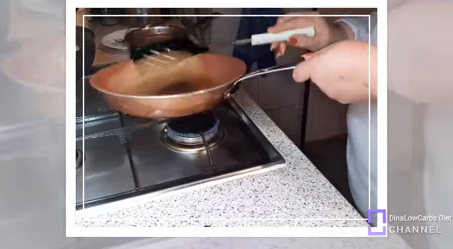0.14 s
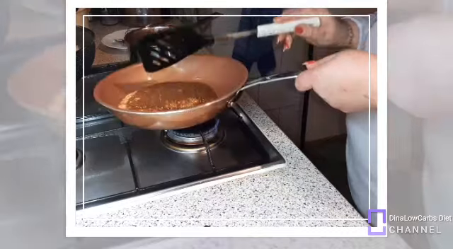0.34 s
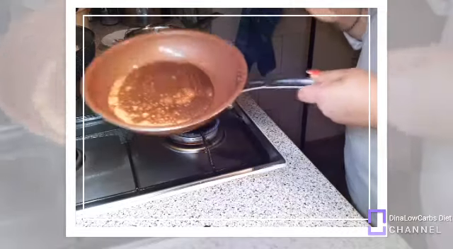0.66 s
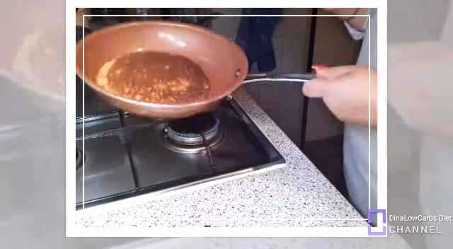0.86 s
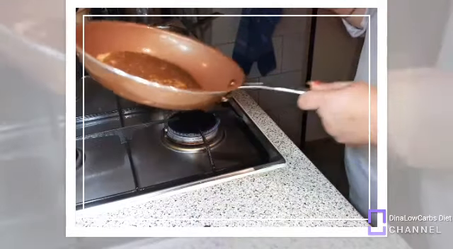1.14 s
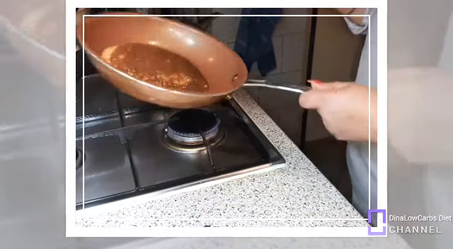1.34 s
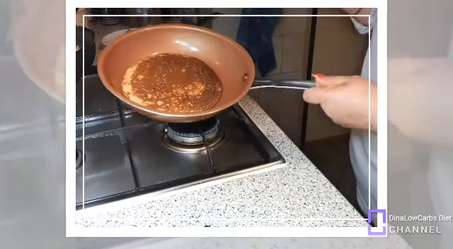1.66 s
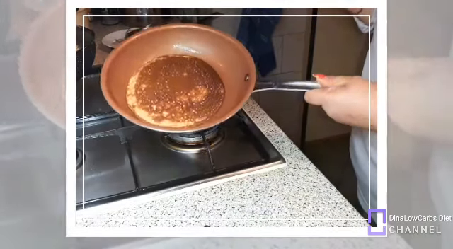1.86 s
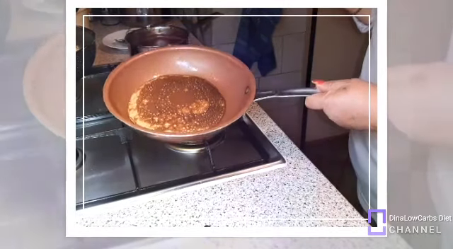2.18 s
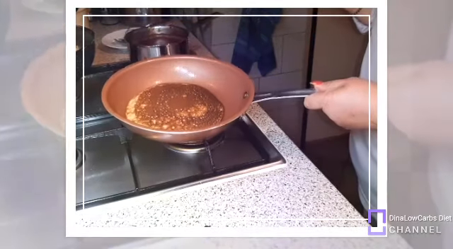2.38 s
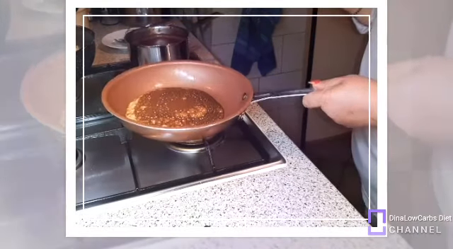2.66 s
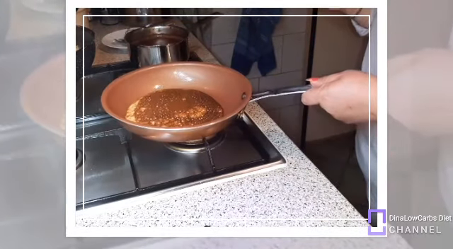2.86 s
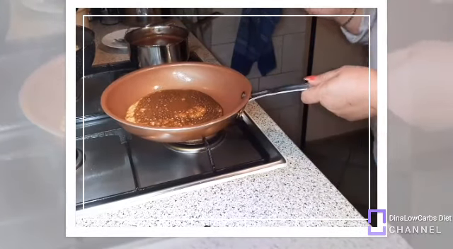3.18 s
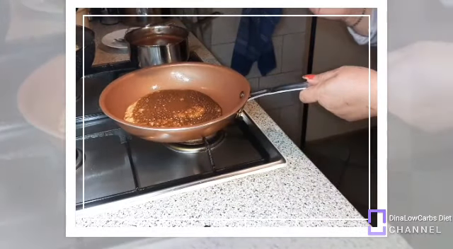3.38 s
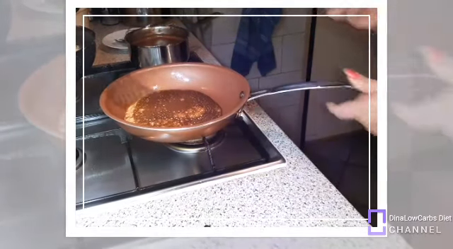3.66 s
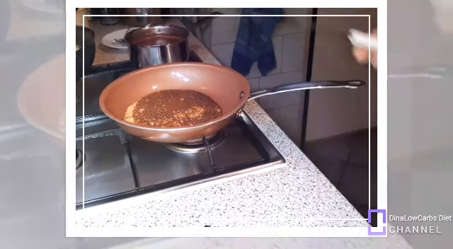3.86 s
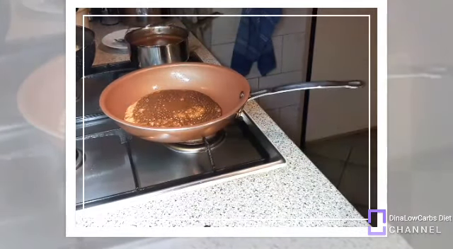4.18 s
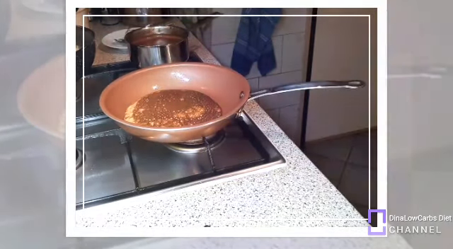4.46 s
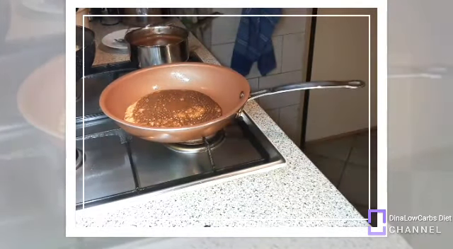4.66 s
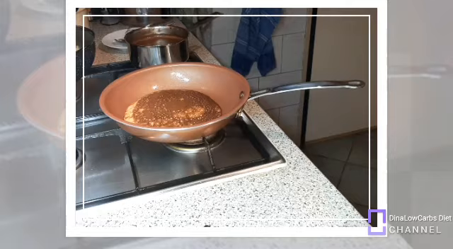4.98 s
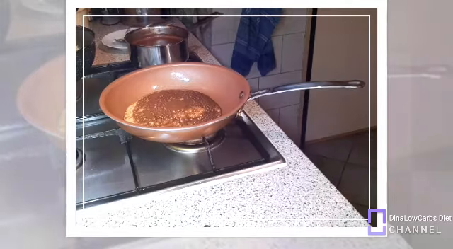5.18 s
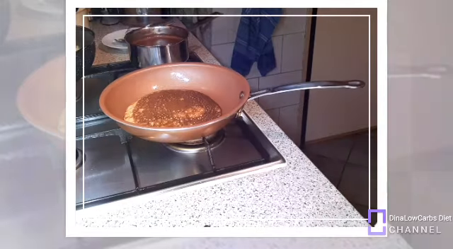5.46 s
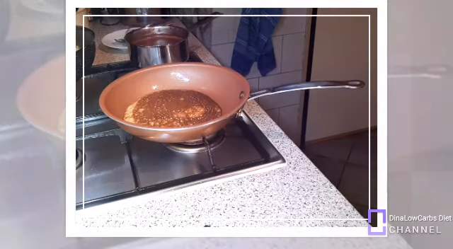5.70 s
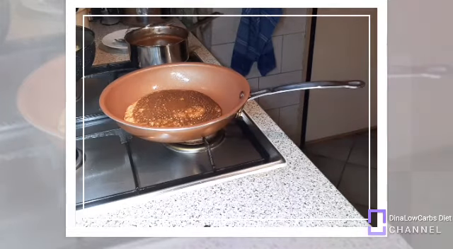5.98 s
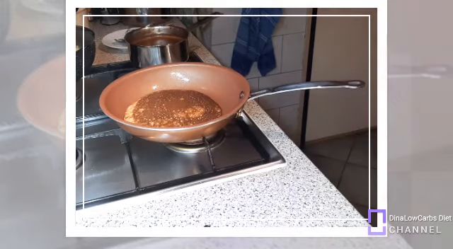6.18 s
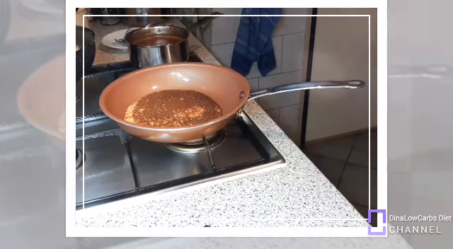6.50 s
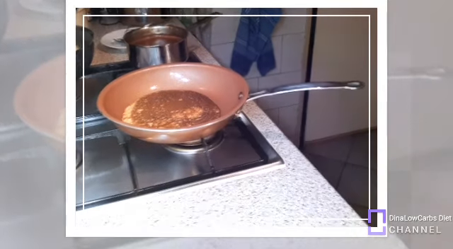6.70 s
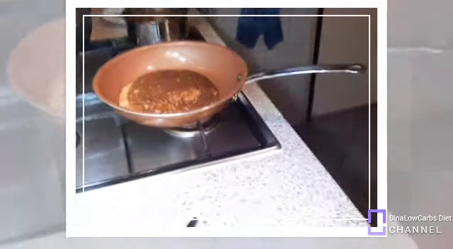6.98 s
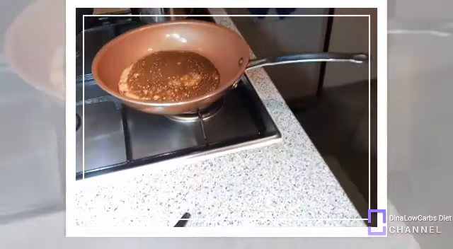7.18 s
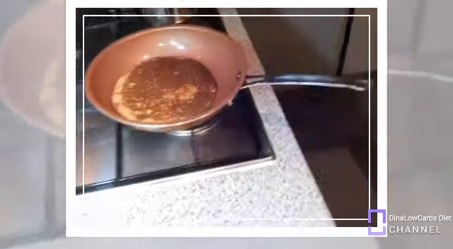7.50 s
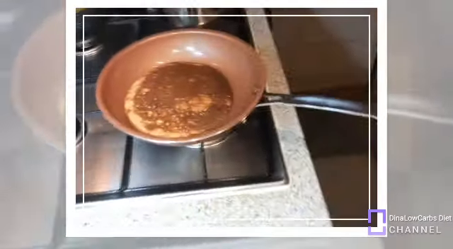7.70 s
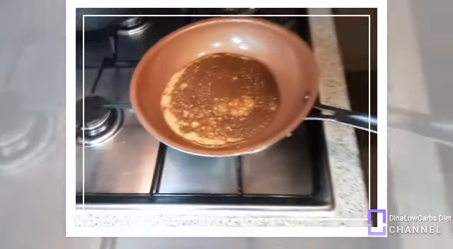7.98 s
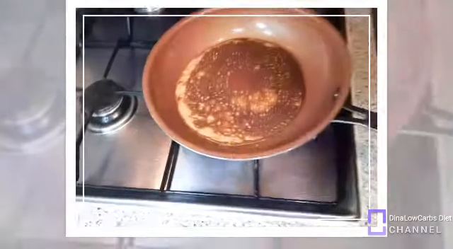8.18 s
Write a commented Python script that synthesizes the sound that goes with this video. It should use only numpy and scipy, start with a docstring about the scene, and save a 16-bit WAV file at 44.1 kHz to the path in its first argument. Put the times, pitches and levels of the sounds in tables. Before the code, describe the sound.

A pancake slaps into a hot pan and sizzles away, the pan knocks on its grate, then steel ware clatters loudly in a tiled kitchen.

```python
"""A pancake slaps into a hot pan and sizzles down: flickering noise bands, bright spits, dull pops.
The pan is knocked back onto its grate: damped modes, noise bursts and a rumble. Further off, steel ware
clatters and bounces in a tiled kitchen: close mode pairs, a rattle and dense echoes. The gas flame is
low noise and a drone. Two ports hear most near sounds a little apart in time and level."""
import sys
import numpy as np
from scipy import signal
from scipy.fft import rfft, irfft, next_fast_len
from scipy.io import wavfile
from scipy.ndimage import uniform_filter1d

SR = 44100
rng = np.random.default_rng(int(sys.argv[2]) if len(sys.argv) > 2 else 0)


def generate_wav(signal):
    """Clip the signal to [-1, 1] and save it as 16-bit WAV at the path in sys.argv[1]."""
    frames = np.transpose(np.atleast_2d(signal))
    scaled = np.clip(frames, -1, 1) * 32767
    pcm = np.round(scaled).astype(np.int16)
    wavfile.write(sys.argv[1], SR, pcm)


N = 367783
SIZE = next_fast_len(N + SR)  # transform length [samples]
HZ = np.arange(SIZE // 2 + 1) * SR / SIZE

# the batter's slap: (time [s], levels in the four pan ranges [dB], t60 [s], rise [s])
SLAP = 0.199, (-24.5, -30, -20, -12.5), 0.054, 0.001
# pops of fat and dry ticks: (time [s], level [dB], centre [Hz], fall-off [dB per octave])
TICKS = [(1.165, -36, 5000, 12), (1.435, -30, 1810, 11.5), (1.779, -39.5, 4500, -1.5),
         (6.191, -17, 2080, 31), (6.219, -46, 4500, 3), (6.499, -43, 500, 4), (6.636, -24.5, 615, 19.5),
         (6.75, -37.5, 350, 2.5), (7.554, -34.5, 796, 14)]
# middles of the pan's ranges: (frequency [Hz])
PAN_RANGE_HZ = 350, 1000, 2400, 5800


def slap_and_ticks():
    """Impulsive excitation: a brief contact gives a decaying burst of noise."""
    slap_s, slap_db, slap_t60, slap_rise = SLAP
    dry = burst(slap_s, PAN_RANGE_HZ, np.array(slap_db), slap_t60, slap_rise)
    for s, level_db, centre_hz, slope_db in TICKS:
        octaves_away = np.abs(np.log2(np.array(PAN_RANGE_HZ) / centre_hz))
        dry += burst(s, PAN_RANGE_HZ, level_db - slope_db * octaves_away, t60=0.043, rise=0.0034)
    return ports(dry, lag=5, pan_db=6) + undb(-15) * room(dry)


# (time [s], level of the sizzle [dB], level of the low middle [dB])
SIZZLE = [(0.129, -71, -72), (0.19, -49, -59.5), (0.216, -39.5, -53.5), (0.235, -41, -53),
          (0.455, -47.5, -64.5), (0.6, -52, -64), (0.691, -47, -61), (0.813, -54.5, -64.5),
          (0.98, -55.5, -77.5), (1.18, -53, -70), (1.33, -56, -69.5), (1.7, -59, -81), (2.0, -61, -77),
          (2.5, -63, -73.5), (3.0, -64, -67), (3.3, -66.5, -78.5), (3.56, -66.5, -63.5), (3.73, -69, -76),
          (3.93, -64.5, -69), (4.2, -68, -69), (4.44, -65.5, -77.5), (4.73, -67, -75), (5.6, -67, -85),
          (5.77, -66, -64), (5.881, -70.5, -67), (6.2, -62, -84.5), (6.33, -72.5, -83), (6.648, -72.5, -78),
          (6.8, -63.5, -63), (6.9, -72.5, -75.5), (7.1, -71, -79), (7.329, -67, -70.5), (7.7, -73.5, -78),
          (7.9, -71.5, -77), (8.34, -68.5, -64.5)]


def sizzle_levels():
    """Amplitude envelope: the sizzle and low-middle levels in dB, joined by straight lines."""
    t = np.arange(N) / SR
    s, fine_db, low_db = np.transpose(SIZZLE)
    return np.interp(t, s, fine_db), np.interp(t, s, low_db)


def sizzle(fine_db, low_db):
    """Superposition of noise bands: fine sizzle, coarse spitting that follows it, low-middle shuffle."""
    # dB of spitting per dB of sizzle, and per dB of low middle
    spit_db = -50 - 7 + 1.124 * (fine_db + 50) + 0.072 * (low_db - low_db.mean())
    return undb(fine_db) * hiss(0) + undb(spit_db) * hiss(1) + undb(low_db) * hiss(2)


# The next six list the steady layers in order: sizzle, spitting, low middle, flame.
# band edges from the top down, one more than the layers: (frequency [Hz])
EDGES_HZ = 15700, 3200, 1200, 500, 30
# spread of each band's own flicker: (level [dB])
FLICKER_DB = 1.2, 1.5, 1.5, 1.2
# spread of the crackle common to a layer's bands: (level [dB])
GRAIN_DB = 1.1, 1.6, 2.8, 3.2
# crackle rate: (rate [1/s])
GRAINS_PER_S = 90, 80, 70, 55
# power share common to both ports: (share [1])
LIKENESS = 0.19, 0.11, 0.56, 0.73
# left over right: (level [dB])
HISS_PAN_DB = 2.3, 2.3, 4.4, 7
# spectrum of the noise: (frequency [Hz], level per Hz [dB])
COLOUR = [(18, -61), (30, -31.5), (43, -35), (108, 0.5), (137, -14.5), (165, 0), (198, -9.5), (301, -7),
          (335, -11.5), (838, -9.5), (1120, -12), (2900, -5.5), (4400, -5.5), (6200, -7.5), (8400, -26),
          (10000, -15.5), (12500, -12.5), (15800, -15.5)]


def hiss(layer):
    """Modulated noise: bands up to half an octave wide flicker alone and crackle together; mid rms is 1."""
    hi_hz, lo_hz = EDGES_HZ[layer:layer + 2]
    like, pan_db = LIKENESS[layer], HISS_PAN_DB[layer]
    band_count = int(np.ceil(2 * np.log2(hi_hz / lo_hz)))
    edges = np.geomspace(lo_hz, hi_hz, 1 + band_count)
    shape = undb(on_log(HZ, *np.transpose(COLOUR)))
    grain = undb(GRAIN_DB[layer] * walk(GRAINS_PER_S[layer]))
    # one noise for both ports, then one for each
    white = rfft(rng.standard_normal((3, SIZE)) * np.resize(grain, SIZE))
    noise = 0
    for a, b in zip(edges, edges[1:]):
        skirt = 1 / np.sqrt((1 + (a / np.maximum(HZ, 1)) ** 16) * (1 + (HZ / b) ** 16))
        band = irfft(white * shape * skirt, SIZE)[:, :N]
        noise = noise + band * undb(FLICKER_DB[layer] * walk(18))
    common = ports(noise[0], lag=5.77, pan_db=pan_db)
    separate = noise[1:] * undb([[pan_db / 2], [-pan_db / 2]])
    out = np.sqrt(like) * common + np.sqrt(1 - like) * separate
    return out / np.std(out.mean(axis=0))


# large spits of fat: (time [s], level before colouring and gain [dB])
SPITS = [(1.5525, -35), (1.644, -38.5), (1.692, -40), (1.7895, -32.5), (4.233, -43.5)]


def spits(fine_db):
    """Random point process: fat droplets burst as bright clicks, a few large, many small with the sizzle."""
    per_s = 60
    when, size = rng.uniform(1e-6, 1, (2, int(per_s * N / SR)))
    at = (when * N).astype(int)
    kick = np.zeros(N)
    kick[at] = undb(fine_db[at] - 1 - 3 * np.log(size))  # rare ones are much larger
    s, level_db = np.transpose(SPITS)
    kick[(s * SR).astype(int)] = undb(level_db)
    t = np.arange(SR // 50) / SR
    envelope = signal.fftconvolve(kick, fade(t, t60=0.006, rise=0.00015))[:N]
    crack = envelope * rng.standard_normal(N)
    bright = undb(on_log(HZ, *np.transpose(COLOUR))) * HZ / (HZ + 2500)
    crack = irfft(rfft(crack, SIZE) * bright, SIZE)[:N]
    return ports(undb(17) * crack, lag=5, pan_db=4)


# resonances of the pops: (centre [Hz], width [Hz], level [dB])
POP_TONES = [(220, 200, 0), (800, 700, -3)]


def pops(low_db):
    """Bubble resonance: steam bursts under the batter in short dull pops at random moments."""
    per_s, scatter_db, top_hz = 45, 14, 1500
    when, size, hand = rng.uniform(0, 1, (3, int(per_s * N / SR)))
    kick = np.zeros(N)
    kick[(when * N).astype(int)] = np.sign(hand - .5) * undb(-scatter_db * size)
    kick = signal.sosfilt(signal.butter(3, top_hz, fs=SR, output="sos"), kick)
    pop = 0
    for hz, width, level_db in POP_TONES:
        tone = signal.lfilter(*signal.iirpeak(hz, hz / width, fs=SR), kick)
        pop = pop + undb(level_db) * SR / width / 2 / np.pi * tone
    follow = undb(-50 + 0.7 * (low_db - low_db.mean()))
    return ports(pop * follow, lag=5, pan_db=5)


# contacts of pan and grate, one list for each set-down:
# (time [s], level [dB], low [dB], middle [dB], upper [dB], top [dB], rumble t60 [s])
KNOCKS = [
    [(2.109, -21, -19.5, -12, -18, -16, 0.22)],
    [(2.274, -31.5, -13.5, -6, -13.5, -19.5, 0.16)],
    [(2.637, -25.5, -14.5, -9.5, -6.5, -12, 0.14), (2.649, -27, -9.5, -9, -27, -22, 0.41)],
    [(3.118, -36.5, -14, -10.5, -22.5, -27, 0.22), (3.179, -42.5, -15, -12, -23, -25, 0.14)],
    [(3.491, -29, -17, -13, -18.5, -18, 0.26)],
]
# mode groups of the pan: (centre [Hz], nominal spread [Hz])
PAN_MODES = [(165, 10), (312, 36), (735, 44), (1200, 104), (1360, 25), (2170, 64), (2320, 58), (2940, 100),
             (3150, 60), (3970, 100), (4250, 110), (5230, 155), (5800, 85)]
# excitation of those groups, one row for each set-down, one column for each group: (level [dB])
PAN_WAKE_DB = [(-3, 1, -4, -5, -1, -6, -2, -3, -7, -12, -2, -1, -17),
               (0, -1, -5, -1.5, -6, -5, -3, -12, -11, -3, -3, -4, -19),
               (-3, -3.5, -4, -1, 1, 1, -11, -8, -9, 5, -14, -2, -7.5),
               (0, -10, -1, -15, -6, 0, -6, -8, -8, 0, -2, 0, 0),
               (5, 0, 0, -15, -1.5, -11, 1, 2, -9, -2, -14, 1, -10)]
# level of each range's second, shorter decay, relative to the first: (level [dB])
PAN_SECOND_DB = -22, -6, -3, 3


def knocks():
    """Damped modal vibration: heavy held pan and grate clank, then the hob rumbles on, darker, in the room."""
    rise = 0.0013
    clank = rumble = 0
    for contacts, wake_db in zip(KNOCKS, PAN_WAKE_DB):
        modes = np.c_[PAN_MODES, wake_db]
        for s, level_db, *spot_db, rumble_t60 in contacts:
            spot_db = level_db + np.array(spot_db)
            tones = ring(s, modes, PAN_RANGE_HZ, spot_db, 0.058, rise, PAN_SECOND_DB,
                         second_t60=0.037, count=3, loose=0.34)
            # broadband crack at the start of each knock
            crack = burst(s, PAN_RANGE_HZ, spot_db + 5.5, 0.032, rise)
            clank = clank + undb(-3) * tones + crack
            rumble = rumble + burst(s, PAN_RANGE_HZ, spot_db + [7.9, 3.0, 3.4, 6.0], rumble_t60, 0.0037)
    near = ports(clank + rumble, lag=5.7, pan_db=6.5, twist=1)
    return near + undb(-1) * room(rumble + undb(-8) * clank)


# steel ware contacts, one list for each fall: (time [s], level [dB], brightness [dB per octave])
CLATTER = [
    [(4.746, -16.5, 2.1)],
    [(4.92, -13.5, 2), (4.931, -17, -0.5), (4.949, -18, 0), (4.961, -18.5, -1), (4.972, -12.5, -1),
     (4.984, -18.5, 3.4), (4.995, -18.5, -3), (5.008, -23, 1)],
    [(5.246, -2.5, -2), (5.258, -9, 1), (5.269, -7, -2), (5.29, -12, 0.5), (5.33, -22, -2.5)],
    [(5.505, -38.5, -2.5), (5.526, -37, 5)],
    [(5.672, -41.5, 1), (5.7, -40.5, 2.5), (5.734, -32, 0.5), (5.757, -44, -2), (5.822, -44.5, 0.5)],
    [(5.902, -5.5, 1), (5.908, -5, -2.5), (5.913, -5, 1), (5.927, -7.5, 5.5)],
    [(6.9915, -34.5, 0), (6.996, -31.5, -0.7)],
]
# how each fall lands: (thud [dB], low [dB], middle [dB], upper [dB], high [dB], top [dB],
# ring over rattle [dB], second decay [dB], nominal ring t60 [s])
LANDING = [(-12.5, -15.5, -7, -11.5, -19.5, -33, -8.5, 1, 0.032),
           (-17.5, -13.5, -12.5, -10, -17, -27, -8.5, -2.5, 0.033),
           (-36, -29, -21, -12.5, -11.5, -28, -6, 4, 0.041),
           (-32, -11.5, -6.5, -9, -17, -47, -7, -4.5, 0.055),
           (-18.5, -19.5, -11, -8, -12, -38, -9, 2, 0.051),
           (-37.5, -32, -15.5, -5, -13, -26, -7, 0.5, 0.044),
           (-22, -14.5, -6.5, -13, -13.5, -36, -6, -26, 0.037)]
# mode groups of the steel: (centre [Hz], nominal spread [Hz])
STEEL_MODES = [(1022, 14), (1370, 95), (1870, 25), (2180, 40), (2270, 50), (2555, 30), (2625, 18),
               (3110, 50), (3521, 31), (3640, 22), (4030, 45), (4190, 70), (4580, 80), (4880, 70),
               (5390, 60), (5684, 66), (6035, 20), (7390, 83), (7620, 37), (8810, 45), (9750, 46),
               (10060, 50), (10450, 50), (11640, 110), (11940, 25), (13050, 62), (13950, 37), (14480, 49)]
# excitation of the lower groups, one row for each fall, one column for each group: (level [dB])
WAKE_DB = [(0.0, -4, -31.5, -27, -15.0, 1.5, -4.5, -31, -15.0, -13, -3, -6.5, -0.5, -3, -9, -3.5, -8),
           (0.0, -2.5, -21, -13.5, -9, -1, -1, -16.5, 1, -5.5, -5.5, -7, -2, -6, -5.5, -2, 1.5),
           (0.0, -4.5, -16.5, -16, -2.5, -3.5, -1, -26.5, -2, 0.5, -5, -5, -7.5, -17, -15, 1, -2.5),
           (0.0, -4.5, -5, -11.5, -0.5, -17, -7.0, -17.5, -1.5, -8.5, -6.5, -6.0, -14.5, -17, -3.5, 0.5, 0.0),
           (0.0, -1.5, -16, -8.5, 0.5, -14, -15.5, -22.5, -2, 0.0, -9.0, -9.5, -14, -10.5, -6.5, 3, 0.5),
           (0.0, -9.5, -13.5, -14.5, -18.5, -11, 1.5, -25, -0.9, -1.5, -11, -15, -15.5, -10, -7.5, -5.5, 0.5),
           (0.0, -4.5, -28, 6, -15, -18, -21, -4, 0, -1, -9, -2, -10, -4.5, -2, -5, -14)]
# excitation of the groups above 7 kHz, alike in every fall: (level [dB])
STEEL_TOP_DB = 1.5, -7.5, -3, -2.5, -2.5, -7, -1, -3.5, -4, -5, -7
# middles of the steel's ranges: (frequency [Hz])
STEEL_RANGE_HZ = 400, 1100, 2500, 3900, 5700, 8500
# ring over rattle in each range: (level [dB])
STEEL_RING_DB = 4, 3, 4, 5, 3.5, -2.5
# level of each range's second, longer decay, added to the fall's own: (level [dB])
STEEL_SECOND_DB = -20, -33, -28, -35, -24.5, -5
# room's answer to each fall: (level [dB])
ECHO_DB = -9, -11, -6.5, -11.5, -6, -11.5, -14
# left over right of each fall, before the right port's own trim: (level [dB])
FALL_PAN_DB = 6.5, 6.4, 5.7, 7.8, 2.5, 5.2, 7.9
# dips in the spectrum of the whole clatter, echoes included: (centre [Hz], width [Hz], gain [dB])
DIPS = [(2960, 220, -5.5), (7090, 170, -8)]


def clatter():
    """Modal vibration under repeated impact: thin steel rings, cracks and rattles at each bounce."""
    dry = wet = 0
    octaves = np.log2(np.array(STEEL_RANGE_HZ) / STEEL_RANGE_HZ[3])
    falls = zip(CLATTER, LANDING, WAKE_DB, ECHO_DB, FALL_PAN_DB)
    for contacts, (*spot_db, ring_db, second_db, held_s), wake_db, echo_db, pan_db in falls:
        fall = 0
        modes = np.c_[STEEL_MODES, [*wake_db, *STEEL_TOP_DB]]
        for s, level_db, bright_db in contacts:
            db = level_db + np.array(spot_db) + bright_db * octaves
            rise, t60 = 0.00071, held_s
            if level_db < -34:  # faint contacts slide: soft start, longer sound
                rise, t60 = 0.012, 1.58 * held_s
                db = db + 8.5
            tones = ring(s, modes, STEEL_RANGE_HZ, db + STEEL_RING_DB, t60, rise,
                         second_db + np.array(STEEL_SECOND_DB), second_t60=0.15, count=2, loose=0.34)
            crack = burst(s, STEEL_RANGE_HZ, db + 8, 0.023, rise)
            rattle_db = db + [10.5, 5.0, 3.5, 3.0, 8.5, 4.0]
            rattle = burst(s, STEEL_RANGE_HZ, rattle_db, 1.22 * t60, max(rise, 0.002))
            fall = fall + undb(ring_db) * tones + crack + rattle
        dry = dry + fall * undb([[pan_db / 2], [-pan_db / 2]])
        wet = wet + undb(echo_db) * fall
    right = ports(dry[1], lag=16.62, pan_db=1, twist=0.4)[1]
    both = np.array([dry[0], right]) + room(wet)
    dip_db = sum(db * np.exp(-((HZ - hz) / width) ** 2) for hz, width, db in DIPS)
    return irfft(rfft(both, SIZE) * undb(dip_db), SIZE)[:, :N]


# level of the flame: (time [s], level [dB])
ROAR = [(0, -58.5), (0.95, -62.5), (2.3, -61), (4.2, -62.5), (4.5, -64.5), (5.8, -62), (6.33, -67),
        (7.65, -70.5), (7.9, -67), (8.34, -63)]
# drone of the burner: (centre [Hz], width [Hz], mean level [dB])
DRONE = [(115, 17, -69)]


def flame(low_db):
    """Combustion noise: a low broadband roar, with noise through a narrow resonance as the burner's drone."""
    t = np.arange(N) / SR
    roar_db = np.interp(t, *np.transpose(ROAR)) + 0.049 * (low_db - low_db.mean())
    out = undb(roar_db) * hiss(3)
    for hz, width, level_db in DRONE:
        drone = signal.lfilter(*signal.iirpeak(hz, hz / width, fs=SR), rng.standard_normal(N))
        out = out + undb(level_db + roar_db - roar_db.mean()) * drone / drone.std()
    return out


# reverberation: (frequency [Hz], t60 [s])
ROOM = [(100, 0.33), (400, 0.35), (1500, 0.4), (5000, 0.32), (14000, 0.063)]


def room(x, bass_hz=400):
    """Diffuse reverberation: tiles answer with dense echoes, alike at both ports only in the bass."""
    t = np.arange(SR // 2) / SR
    tail = np.zeros((2, len(t)))
    for hz in 70 * 2. ** np.arange(8):
        top_hz = min(hz * (2 if hz > 8000 else np.sqrt(2)), 17000)
        sos = signal.butter(2, [hz / np.sqrt(2), top_hz], "band", fs=SR, output="sos")
        like = 1 / (1 + (hz / bass_hz) ** 2)
        noise = rng.standard_normal((3, len(t)))
        noise = np.sqrt(like) * noise[0] + np.sqrt(1 - like) * noise[1:]
        t60 = on_log(hz, *np.transpose(ROOM))  # the treble dies first
        tail += signal.sosfilt(sos, noise) * undb(-60 * t / t60)
    tail *= 1 - np.exp(-t / 0.00029)
    tail /= np.sqrt(np.sum(tail ** 2) / 2)
    return signal.fftconvolve(x[None], tail * undb([[1.5], [-1.5]]), axes=1)[:, :N]


def ring(s, modes, group_hz, spot_db, t60, rise, second_db, second_t60, count, loose):
    """Modal superposition: a blow wakes close modes in each group; a second part decays at its own rate."""
    t = np.arange(SR // 4) / SR
    hz, spread, db = np.repeat(np.transpose(modes), count, axis=1)
    group = np.argmin(np.abs(np.log(hz[:, None] / group_hz)), axis=1)
    db = db - np.array([db[group == g].max() for g in group])  # counted from the loudest of its range
    gain_chance, pitch_chance, phase = rng.uniform(-1, 1, (3, len(hz)))
    # place in the group, a little off at each blow
    side = np.resize(np.linspace(-1, 1, count), len(hz)) + loose * pitch_chance
    gain = undb(db + np.asarray(spot_db)[group] + 3 * gain_chance)
    mode_hz = hz + .6 * spread * side
    tones = np.sin(2 * np.pi * (mode_hz[:, None] * t + phase[:, None]))
    # loose parts chatter against each other: every mode throbs on its own
    throb = rng.standard_normal((len(hz), len(t) // 300 + 1))
    throb = np.repeat(throb, 300, axis=1)[:, :len(t)]
    tones = tones * undb(4.28 * uniform_filter1d(throb, size=200, axis=1))
    first = gain @ tones
    second = (gain * undb(second_db)[group]) @ tones
    return place(s, first * fade(t, t60, rise) + second * fade(t, second_t60, rise))


def burst(s, group_hz, spot_db, t60, rise):
    """Filtered noise: a decaying puff in the colour of the blow, thin outside its ranges."""
    t = np.arange(SR // 3) / SR
    hz = np.arange(len(t) // 2 + 1) * SR / len(t)
    points_hz = [group_hz[0] / 4, *group_hz, 2 * group_hz[-1]]
    tint_db = on_log(hz, points_hz, [spot_db[0] - 14, *spot_db, spot_db[-1] - 26.5])
    # the ranges widen with pitch; no deep bass
    tint = undb(tint_db) / np.sqrt(np.maximum(hz, 100) / 3000) * (hz / (hz + 35)) ** 2
    noise = irfft(rfft(rng.standard_normal(len(t))) * tint, len(t))
    return place(s, noise * fade(t, t60, rise))


def fade(t, t60, rise):
    """Exponential decay: a soft start, then 60 dB of fall in each t60."""
    return (1 - np.exp(-t / np.maximum(rise, 1e-4))) ** 2 * undb(-60 * t / np.maximum(t60, .004))


def place(s, sound):
    """Time shift: the sound at its moment in silence."""
    out = np.zeros(N + SR)
    start = int(s * SR)
    out[start:start + len(sound)] = sound
    return out[:N]


def ports(x, lag, pan_db, twist=0):
    """Interaural-style cues: the right port lags by samples and differs in level; twist varies its phase."""
    turn = np.interp(HZ, np.arange(64) * 350, rng.standard_normal(64))
    turn = twist * turn * np.minimum(HZ / 2000, 1)  # a wide plate: another phase at each pitch
    late = irfft(rfft(x, SIZE) * np.exp(1j * turn - 2j * np.pi * HZ * lag / SR), SIZE)[:N]
    return np.array([x * undb(pan_db / 2), late * undb(-pan_db / 2)])


def walk(rate):
    """Random modulation: a new level every 1 / rate s, joined by straight slopes; spread near 1."""
    k = int(SR / rate)
    steps = np.repeat(rng.standard_normal(N // k + 1), k)
    return 1.31 * uniform_filter1d(steps, k)[:N]


def on_log(hz, xs, ys):
    """Logarithmic pitch scale: straight lines on a log-frequency axis."""
    return np.interp(np.log(np.maximum(hz, 1)), np.log(xs), ys)


def undb(db):
    """Logarithmic level scale: decibels to amplitude gain."""
    return 10 ** (np.asarray(db) / 20)


def scene():
    """Linear superposition: all sources add at both ports."""
    fine_db, low_db = sizzle_levels()
    pancake = slap_and_ticks() + sizzle(fine_db, low_db) + spits(fine_db) + pops(low_db)
    return pancake + knocks() + clatter() + flame(low_db)


def record(dry):
    """Band limiting and saturation: the microphone loses deep bass, rounds loud peaks and cuts the top."""
    dry = signal.sosfilt(signal.butter(3, 45, "high", fs=SR, output="sos"), dry)
    rounded = .9 * np.tanh(dry / .9)
    return signal.sosfilt(signal.ellip(10, .2, 70, 15800, fs=SR, output="sos"), rounded)


dry = scene()
out = record(dry)
generate_wav(out)
```